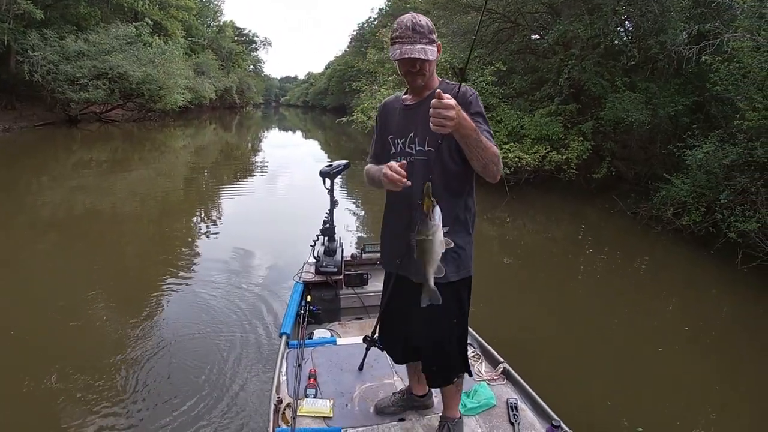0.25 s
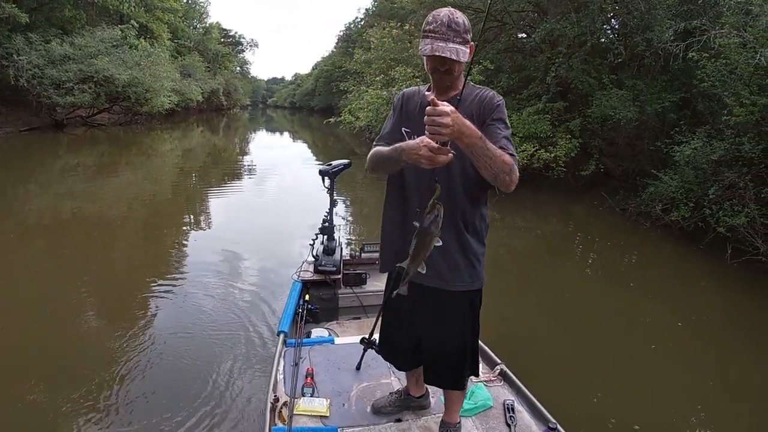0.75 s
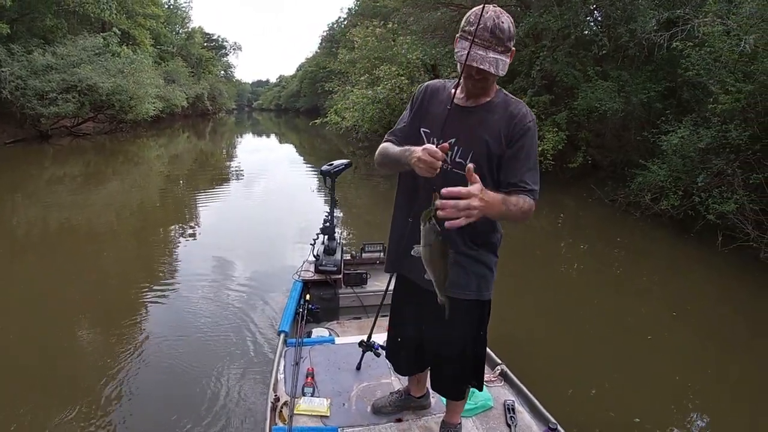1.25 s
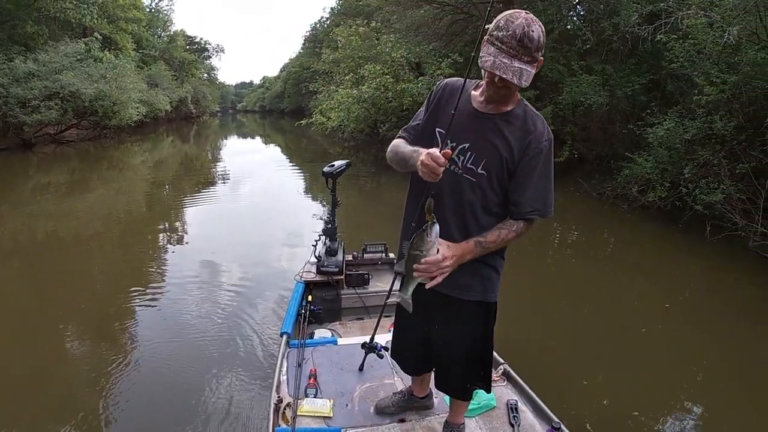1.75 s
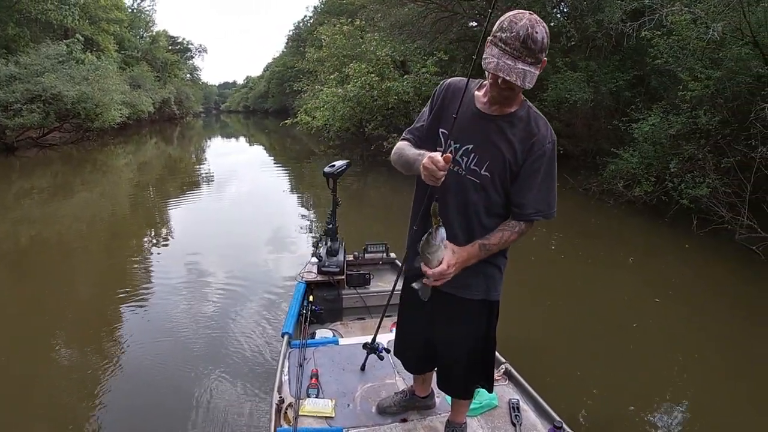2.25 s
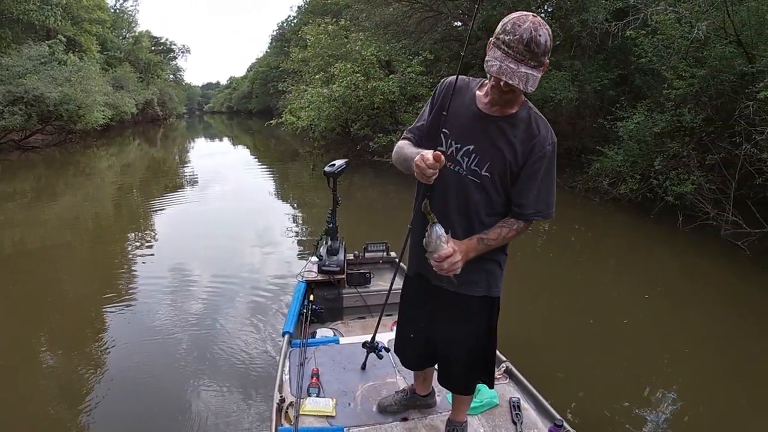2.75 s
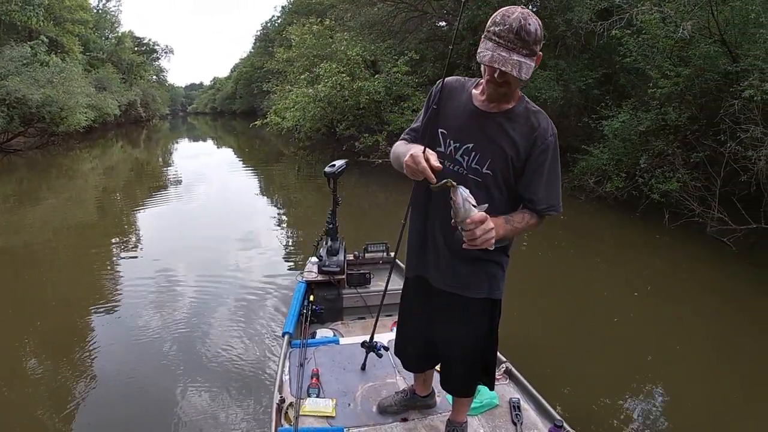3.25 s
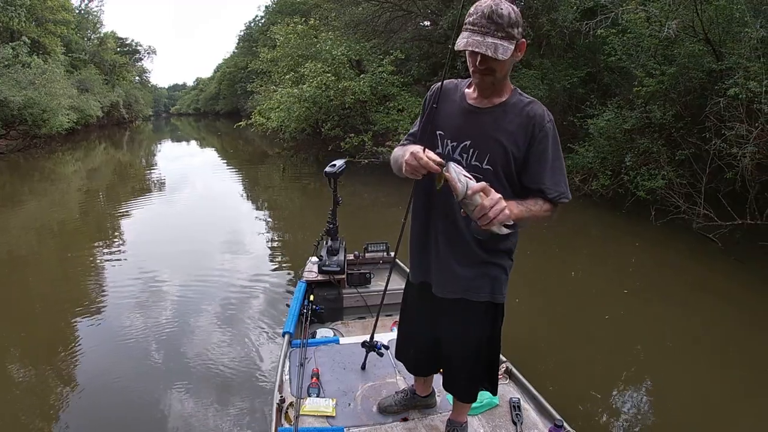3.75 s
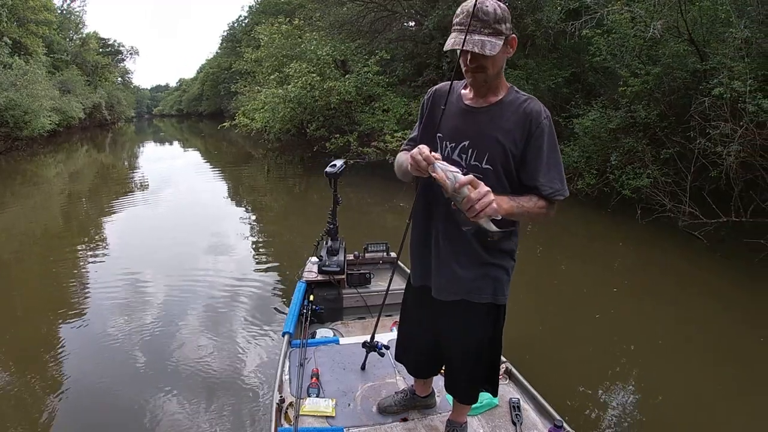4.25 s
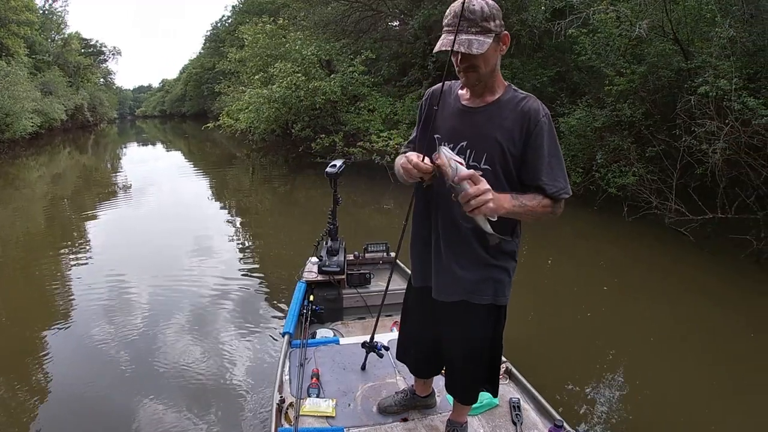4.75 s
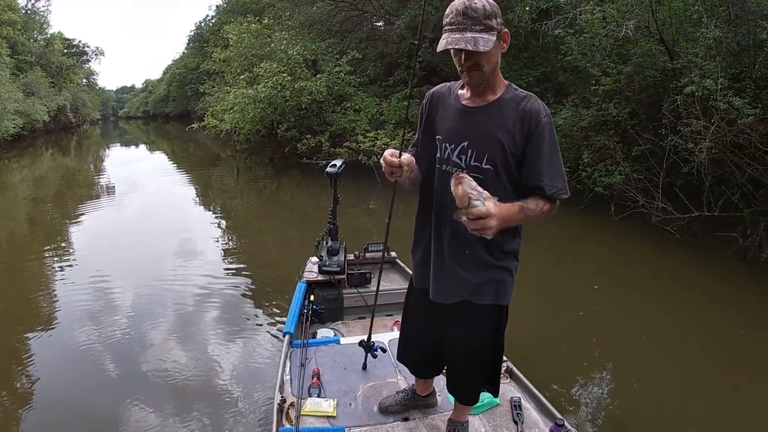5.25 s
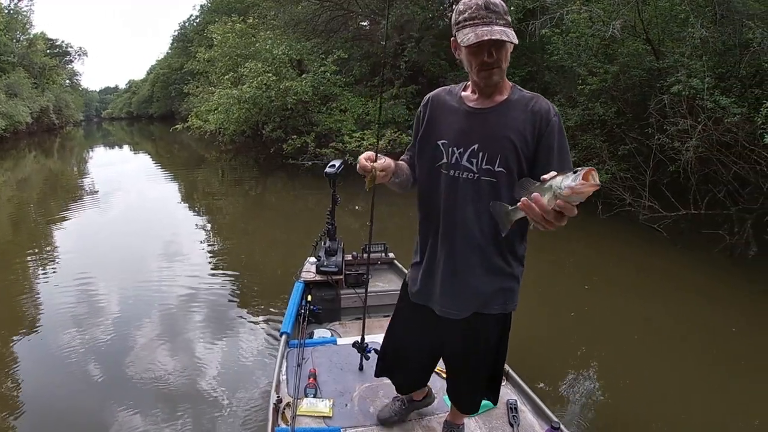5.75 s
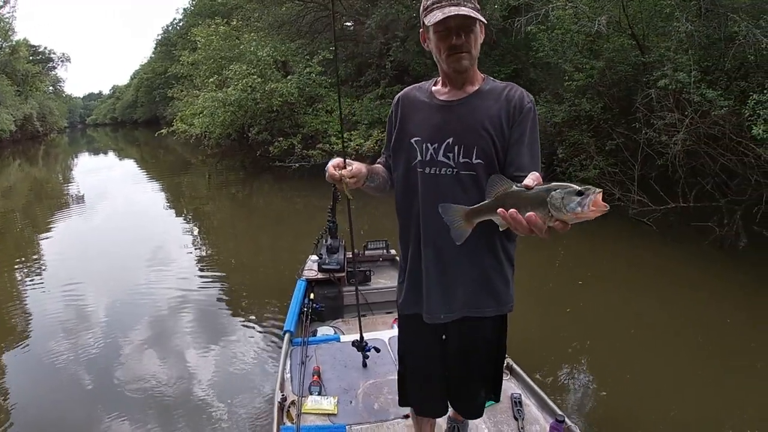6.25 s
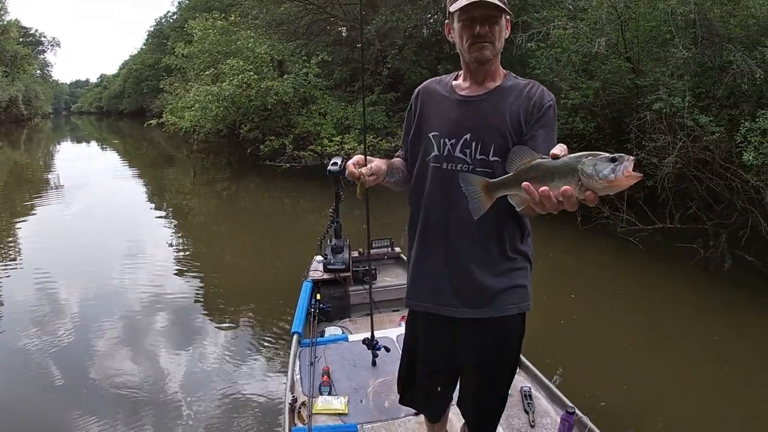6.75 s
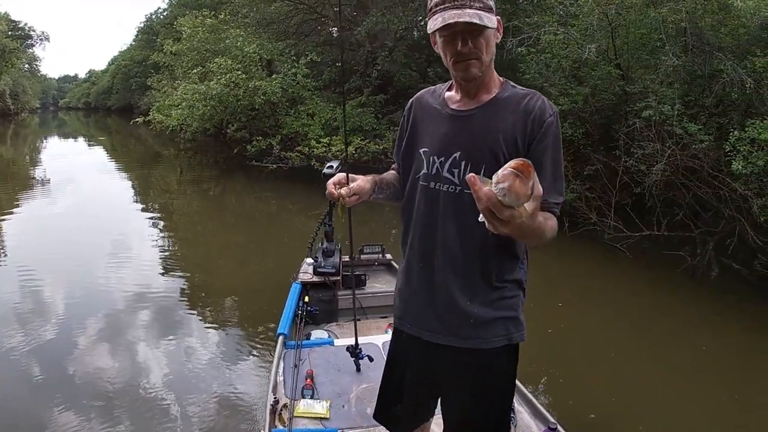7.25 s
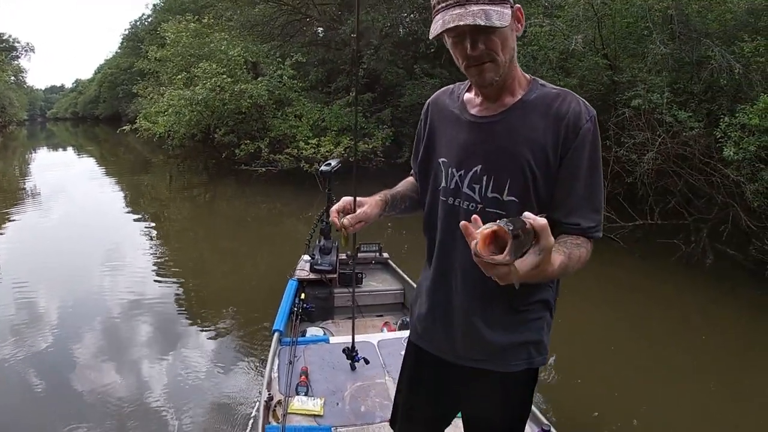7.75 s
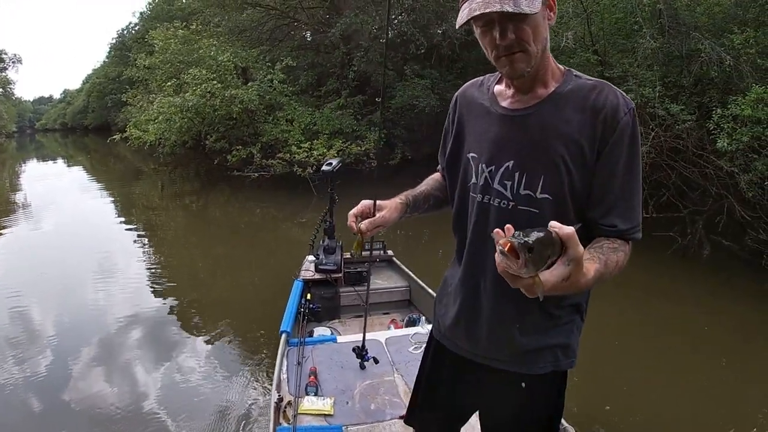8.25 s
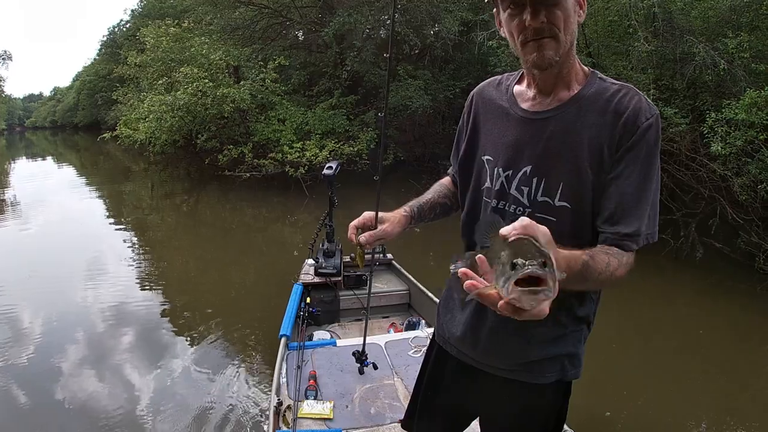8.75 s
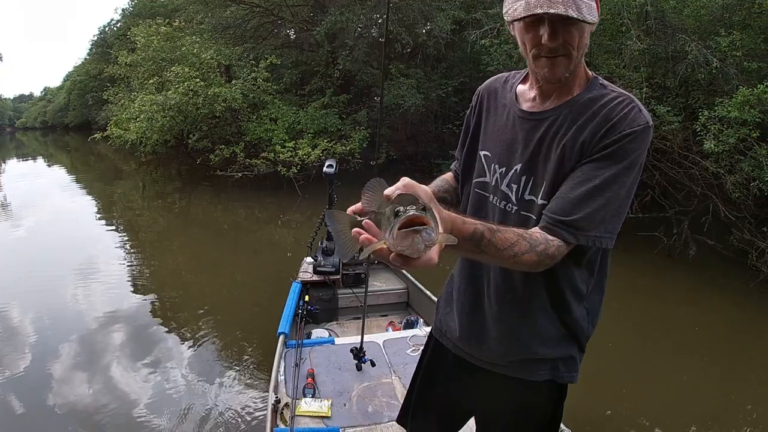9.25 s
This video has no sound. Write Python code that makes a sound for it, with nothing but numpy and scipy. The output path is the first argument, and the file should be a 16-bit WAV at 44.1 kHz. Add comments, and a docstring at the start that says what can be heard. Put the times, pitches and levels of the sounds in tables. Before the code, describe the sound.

A shrill cicada chorus, with a softer lower layer, runs throughout along a tree-lined river, swelling around 2.5 seconds and again after 7. Two finer, very high buzzes waver nearby until they slow and fade between about 6 and 8 seconds. Water murmurs low at a small metal boat. At 0.5 seconds a cluster of soft, deep thumps shakes the hull, with lesser bumps near 1.1. Faint far whistles come around 1.5, then a bright, quick bird phrase at 2.3 to 2.6, echoing from the trees. Wet clicks gather from 4 to 5.1, strongest at 4.5, with a short rub near 5. Taps and a low thump follow around 6.2, a firmer knock at 7.3, and a soft bump at 8.7. Distant birds whistle at 4.5, 7.8 and 8.6, with a faint hoot at 8.8. The single-channel microphone sits on the boat.

```python
"""Cicadas drone in the trees along a summer river, two nearer insects buzz, and water murmurs at a small metal boat.
A bird sings one quick phrase from the bank and others whistle far off: gliding tones with echoes from the trees.
An angler shifts his feet and unhooks a fish: soft thumps ring the hull; noise bursts make taps and wet clicks.
The insects are trains of clicks, filtered to give them their pitch; water and rubbing are filtered noise."""
import sys
import numpy as np
from scipy import signal
from scipy.fft import rfft, irfft
from scipy.io import wavfile

SR = 44100
rng = np.random.default_rng(int(sys.argv[2]) if len(sys.argv) > 2 else 0)


def generate_wav(sig):
    """Save sig (samples, or channels by samples) to the path in sys.argv[1] as 16-bit PCM at SR."""
    pcm = np.round(np.clip(np.atleast_2d(sig).T, -1, 1) * 32767).astype(np.int16)
    wavfile.write(sys.argv[1], SR, pcm)


N = 419832  # length in samples

# feet and knees against the boat: start_s, level_db (peak of the panel's part), pitch_hz,
# decay_s (time for the panel to fall by 60 dB)
THUMP_BLOWS = [(.476, -32, 74.2, 0.36), (.499, -26.5, 107, 0.07), (.506, -34.5, 222, 0.044),
               (.507, -48.5, 370, .06), (.533, -30.5, 72.3, 0.11), (.546, -36, 165, 0.067),
               (.591, -43, 180, .15), (1.031, -49.5, 280, 0.11), (1.122, -47.5, 172, 0.056),
               (1.279, -50.5, 261, 0.08), (5.923, -45.5, 186, 0.11), (6.159, -28.5, 77, 0.17),
               (6.248, -44, 225, 0.11), (6.283, -45, 180, .16), (6.645, -44, 149, 0.11),
               (6.658, -43, 493, 0.072), (6.675, -50, 298, 0.054), (7.172, -42.5, 206, 0.16),
               (7.264, -27, 168, 0.071), (7.27, -36, 90.4, 0.1), (7.287, -31.5, 203, 0.069),
               (7.517, -39.5, 174, .09), (7.52, -51, 410, .062), (8.702, -36.5, 167.4, 0.17),
               (8.703, -47, 240, 0.1), (8.71, -38, 107, 0.165)]


def from_db(db):
    """Turn decibels into a gain."""
    return 10 ** (np.asarray(db) / 20)


def rms_one(x):
    """Scale a sound to an average (rms) level of 1."""
    return x / np.sqrt(np.mean(x ** 2) + 1e-20)


def in_time(rows):
    """Draw each column of a table as a curve, sample by sample; the first column is time."""
    s, *columns = np.transpose(rows)
    return [np.interp(np.arange(N) / SR, s, column) for column in columns]


def colour(x, spectrum):
    """Filter a steady sound to a spectrum, then scale it to rms 1."""
    hz, db = np.transpose(spectrum)
    f = np.fft.rfftfreq(N, 1 / SR) + 1e-3  # the small offset avoids log(0)
    gain = from_db(np.interp(np.log(f), np.log(hz), db))
    return rms_one(irfft(rfft(x) * gain, N))


def drift(per_s):
    """Wander at random: straight lines join random points of spread 1, per_s of them a second."""
    knots = rng.standard_normal(4096)
    return np.interp(np.arange(N) / SR * per_s, np.arange(len(knots)), knots)


def resonate(x, hz, width):
    """Ring at one pitch, with gain 1 at the top; a narrow width (Hz) rings longer."""
    r = np.exp(-np.pi * width / SR)
    feed = np.array([1, 0, -1]) * (1 - r * r) / 2
    feedback = [1, -2 * r * np.cos(2 * np.pi * hz / SR), r * r]
    return signal.lfilter(feed, feedback, x + 1e-18)


def dying(t, t60):
    """Fade exponentially, falling by 60 dB in t60 seconds."""
    return np.exp(-np.log(1000) * t / t60)


def add(out, s, sound):
    """Mix a short sound in at time s (seconds)."""
    at = max(round(s * SR), 0)
    out[at:at + len(sound)] += sound[:N - at]


def click_train(per_s, uneven_db):
    """Make one click a cycle, each of its own strength, placed between samples."""
    cycles = rng.random() + np.cumsum(per_s) / SR
    at = np.flatnonzero(np.diff(np.floor(cycles)))
    late = (np.ceil(cycles[at]) - cycles[at]) * SR / per_s[at]  # fraction of a sample
    strengths = from_db(uneven_db * rng.standard_normal(8192))
    size = strengths[np.arange(len(at)) % 8192]
    out = np.zeros(N)
    out[at], out[at + 1] = size * (1 - late), size * late
    return out


def woods(x, t60, wet_db, build_s=0.0093):
    """Trunks and leaves scatter a sound into a smooth tail that builds up, then dies."""
    t = np.arange(2 * SR) / SR
    tail = rng.standard_normal(len(t)) * dying(t, t60) * (1 - np.exp(-t / build_s))
    scattered = signal.fftconvolve(x, tail / np.linalg.norm(tail))[:N]
    return x + from_db(wet_db) * scattered


def river():
    """Slow water murmurs at the hull and washes along it; each thump rocks the boat and stirs a dying rumble."""
    # low rumble under the thumps, before the trim below: time_s, level_db
    rumble_levels = [(0, -61), (.45, -60), (1.0, -53.5), (1.35, -66), (2.9, -65), (3.2, -59.5), (4.3, -67),
                     (4.5, -85), (5.5, -80), (6.85, -56.5), (7.05, -65), (7.33, -44.5), (8.0, -71),
                     (9.52, -58.5)]
    # water stirred along the sides, before its random flicker: time_s, level_db
    wash_levels = [(0, -74), (1.3, -74), (1.9, -77), (5.3, -74.5), (6.1, -66.5), (8, -68.5), (9.52, -67.5)]
    # water at the hull, before its random flicker: time_s, level_db
    water_levels = [(0, -61.5), (2.6, -62), (3.7, -61), (4.5, -61.5), (5.2, -62.5), (5.9, -60),
                    (9.52, -63.5)]
    # tone colour of water and air around the boat: pitch_hz, relative level_db (per Hz)
    water_colour = [(20, -1), (45, -2.5), (80, -8.5), (120, -3), (175, 3.5), (230, -5), (300, -15.5),
                    (450, -22), (600, -21.5), (760, -14.5), (1000, -22), (2000, -23.5), (4000, -19),
                    (14000, -57)]
    # tone colour of the wash: pitch_hz, relative level_db (per Hz)
    wash_colour = [(80, -25), (180, 3), (300, -2.5), (450, -3), (700, -20), (1300, -17), (3000, -31.5)]
    # tone colour of the rumble: pitch_hz, relative level_db (per Hz)
    rumble_colour = [(15, -17), (35, 7), (65, 8), (110, -1.5), (250, -7), (600, -71)]
    rock_db, rock_t60_s = -15.5, 0.72  # rumble compared with the blow, before the trim; its fade
    rock_hz = 130  # a blow well above this pitch is too quick to rock the boat much

    (rumble_db,), (wash_db,), (water_db,) = in_time(rumble_levels), in_time(wash_levels), in_time(water_levels)
    t = np.arange(2 * SR) / SR
    rocking_power = from_db(rumble_db) ** 2
    for s, db, hz, _ in THUMP_BLOWS:
        sway = from_db(db + rock_db) / (1 + (hz / rock_hz) ** 2) * dying(t, rock_t60_s)
        add(rocking_power, s, sway ** 2)
    water = from_db(water_db + 1.9 * drift(11)) * colour(rng.standard_normal(N), water_colour)
    wash = from_db(wash_db + 3.7 * drift(22)) * colour(rng.standard_normal(N), wash_colour)
    flicker = from_db(3.6 * drift(10.0) - 1.0)  # includes a trim of -1 dB
    rumble = np.sqrt(rocking_power) * flicker * colour(rng.standard_normal(N), rumble_colour)
    return water + wash + rumble


def cicadas(song, throb_db, far_db, count):
    """A few tymbals (drum skins) click and throb at their own paces, over the noise blur of countless far ones."""
    near = 0
    # each insect's clicks per second and throbs per second
    for pace, throb_hz in rng.uniform([180, 5], [480, 24], (count, 2)):
        throb_cycles = np.cumsum(throb_hz * (1 + 0.1463 * drift(3))) / SR
        throb = np.sin(2 * np.pi * throb_cycles)
        train = click_train(pace * (1 + .04 * drift(150)), uneven_db=1.5)
        near = near + train * from_db(throb_db * throb)
    far = colour(rng.standard_normal(N), song)
    return rms_one(colour(near, song) + from_db(far_db) * far)


def chorus():
    """Two kinds of cicada swell and ebb along the banks; one thin trill, noise in a narrow ring, holds its pitch."""
    # the two kinds, before their trims below: time_s, shrill_level_db, low_level_db
    chorus_levels = [(0.08, -49, -60), (1.4, -48, -61), (1.75, -46, -57.5), (2.26, -45, -58),
                     (2.6, -44, -56), (3.59, -48.5, -59.5), (4.07, -48, -61), (4.24, -48.5, -61.5),
                     (4.28, -48.5, -59), (5.56, -50, -61), (6.01, -49, -60), (6.59, -49, -60.5),
                     (6.99, -46.5, -60.5), (7.66, -46, -57), (9.33, -46, -58.5), (9.45, -46, -59.5)]
    # tone colour of the shrill kind: pitch_hz, relative level_db (per Hz)
    shrill_song = [(2500, -44), (4200, -12), (4750, -5.5), (5150, 0), (5700, 2), (6100, -1.5), (6600, -8),
                   (7200, -15.5), (7800, -19), (8400, -23.5), (9100, -21.5), (10300, -32.5), (11500, -40.5),
                   (15000, -49)]
    # tone colour of the lower kind: pitch_hz, relative level_db (per Hz)
    low_song = [(1900, -35), (2500, -18.5), (3000, -11.5), (3400, -2), (3800, 4.5), (4200, 5), (4700, -6),
                (5600, -26), (8000, -57)]
    trill_hz, trill_db = 5260, -61

    shrill_db, low_db = in_time(chorus_levels)
    shrill = from_db(shrill_db + 4.78) * cicadas(shrill_song, throb_db=3.0, far_db=-0.5, count=9)
    low = from_db(low_db + 5.67) * cicadas(low_song, throb_db=0.5, far_db=4.5, count=4)
    trill = resonate(resonate(rng.standard_normal(N), trill_hz, 40), trill_hz, 40)
    return shrill + low + from_db(trill_db) * rms_one(trill)


def near_insects():
    """Steady click trains ring a small body as wavering high lines; each slows and fades as it winds down."""
    # the two insects: pace (clicks per second), level_db (before trim and fading), wind_down_start_s
    insects = [(329.7, -64.3, 6.4), (335, -66, 6.1)]
    # resonances of an insect's body: pitch_hz, width_hz, relative level_db
    body = [(9410, 530, -1), (9830, 440, -0.5), (14000, 870, -19)]
    wind_down_s, wind_down_db = 1.4, -13.5  # how long it takes, and the change in level
    slowing = .025  # share of the pace lost
    trim_db = 0.56

    out = 0
    for pace, buzz_db, tires_s in insects:
        spent = np.clip((np.arange(N) / SR - tires_s) / wind_down_s, 0, 1)
        unsteady = .0045 * drift(200) + .0015 * drift(12) + .0022 * drift(1.2)
        train = click_train(pace * (1 - slowing * spent + unsteady), uneven_db=2.0)
        buzz = 0
        for hz, width, db in body:
            ring = resonate(resonate(train, hz, width), hz, width)
            # leaves scatter the ring of each resonance
            buzz = buzz + from_db(db) * woods(ring, t60=0.14, wet_db=0.0)
        flutter_db = 1.0 * drift(25) + 0.6 * drift(1.88)
        out = out + from_db(trim_db + buzz_db + wind_down_db * spent + flutter_db) * rms_one(buzz)
    return out


def whistle(notes, attack, release, second_db, third_db, waver=0):
    """Nearly pure notes arc through three pitches; attack and release are shares of a note, waver shakes the pitch."""
    out, shake = np.zeros(N), 1 + waver * drift(180)
    for s, length, start, middle, end, db in notes:
        u = np.linspace(0, 1, round(length * SR))  # progress through the note
        arc = np.polyfit([0, .5, 1], [start, middle, end], 2)
        pitch = np.polyval(arc, u) * shake[round(s * SR):][:len(u)]
        phase = 2 * np.pi * np.cumsum(pitch) / SR
        overtones = from_db(second_db) * np.sin(2 * phase) + from_db(third_db) * np.sin(3 * phase)
        tone = np.sin(phase) + overtones
        edge = np.minimum(1, np.minimum(u / attack, (1 - u) / release))
        swell = np.sin(np.pi / 2 * edge) ** 2
        add(out, s, np.sqrt(2) * from_db(db) * tone * swell)
    return out


def birds():
    """A small near bird, weak at low pitch, is mostly direct with a long mellow echo; trees blur the far birds."""
    # The three tables share columns: start_s, length_s, start_hz, middle_hz, end_hz,
    # level_db (of the whistle, before any flicker, filter, echo or trim).
    # the near bird's glides
    near_notes = [(2.276, .089, 2050, 4810, 2700, -34), (2.356, .028, 2950, 3650, 5700, -35.5),
                  (2.379, .014, 5350, 4650, 4200, -38), (2.461, .044, 5020, 5270, 5300, -28.4),
                  (2.489, .016, 5420, 5730, 5880, -34), (2.545, .01, 5000, 4100, 2800, -33.5),
                  (2.551, .021, 3000, 2250, 1500, -44)]
    # the far birds' glides
    far_notes = [(1.46, 0.048, 2500, 2380, 2380, -71), (1.53, .05, 2680, 2700, 2870, -69),
                 (1.572, 0.034, 2740, 3050, 3630, -56.5), (1.705, 0.044, 3220, 3220, 3180, -59),
                 (4.445, 0.075, 2850, 2404, 2600, -64.5), (4.553, 0.0415, 3260, 2810, 2750, -59),
                 (4.588, .1, 2640, 2465, 2180, -69), (7.78, .05, 3295, 2950, 2900, -56.5),
                 (7.83, .05, 2990, 2650, 2380, -65), (7.945, 0.05, 2710, 2580, 2690, -61),
                 (8.49, 0.08, 2760, 2830, 2920, -71), (8.67, .085, 2650, 2930, 2440, -63)]
    # a distant hoot
    hoot_notes = [(8.795, 0.262, 748, 706, 740, -62.5)]
    throat_hz = 2350  # the small bird gives out little sound below this pitch

    song = whistle(near_notes, attack=.36, release=.2, second_db=-36, third_db=-31, waver=.006)
    song = song * from_db(1.0 * drift(250))
    song = signal.sosfilt(signal.butter(4, throat_hz, "high", fs=SR, output="sos"), song)
    near = woods(song, t60=.35, wet_db=-9.5)
    # the middle pitches roll on along the banks; only the echo is kept
    mellow = resonate(resonate(song, 2240, 450), 2670, 450)
    long_echo = woods(mellow, t60=6.3, wet_db=3.5, build_s=0.064) - mellow

    calls = whistle(far_notes, attack=0.13, release=0.24, second_db=-34, third_db=-40, waver=0.022)
    far = woods(calls * from_db(3.7 * drift(70)), t60=.65, wet_db=3.5)
    hoot = whistle(hoot_notes, attack=0.4, release=0.19, second_db=-26, third_db=-35)
    return near + long_echo + from_db(-1) * far + woods(hoot, t60=0.22, wet_db=-4.5)


def rubbing():
    """Cloth, hands and wet skin rub: each stroke is uneven friction noise that swells and fades."""
    # strokes: start_s, level_db (rms), pitch_hz, length_s
    strokes = [(0.503, -68, 800, .07), (0.593, -68, 1400, 0.041), (1.268, -68, 570, 0.058),
               (4.833, -68.5, 1590, 0.32), (4.952, -62.5, 1000, .014), (4.956, -54, 2600, 0.017),
               (5.655, -77, 920, 0.39), (6.656, -63.5, 455, 0.098), (7.265, -54.5, 705, 0.014),
               (7.88, -68, 1520, 0.1), (8.29, -72, 645, .089)]
    out, grain = np.zeros(N), from_db(1.0 * drift(180)) * rng.standard_normal(N)
    for s, db, hz, length in strokes:
        stroke = grain[round(s * SR):round((s + length) * SR)]
        width = 0.79 * hz
        stroke = resonate(resonate(stroke, hz, width), hz, width)
        stroke = stroke * signal.windows.tukey(len(stroke), .6)
        add(out, s, from_db(db) * rms_one(stroke))
    return out


def clicks(rows, width_hz, t60, tail_db, tail_t60):
    """Each contact is a brief rough burst in one broad resonance, with a short rattle after it."""
    out, t = np.zeros(N), np.arange(SR // 5) / SR
    for s, db, hz in rows:
        fade = dying(t, t60) + from_db(tail_db) * dying(t, tail_t60)
        burst = rng.standard_normal(len(t)) * fade
        click = resonate(resonate(burst, hz, width_hz), hz, width_hz)
        add(out, s, from_db(db) * click / np.abs(click).max())
    return out


def handling():
    """Tackle taps on the deck, wet clicks of the fish and sharp ticks of the line are short noise bursts."""
    # Each level_db is a peak before the trims below.
    # light taps of tackle on the deck: start_s, level_db, pitch_hz
    tap_hits = [(0.501, -42.5, 397), (0.532, -48, 425), (1.068, -47.5, 720), (1.275, -51, 423),
                (1.696, -53, 423), (2.038, -51, 800), (5.759, -48.5, 837), (5.913, -50.5, 934),
                (6.028, -46.5, 450), (6.156, -44, 541), (6.192, -45.5, 487), (6.405, -48.5, 482),
                (6.476, -50, 635), (6.811, -55, 870), (6.937, -53, 430), (7.138, -51, 732),
                (7.177, -52, 423), (7.588, -47.5, 503), (8.302, -50.5, 506), (8.962, -51.5, 700)]
    # wet clicks as the hook works in the fish's mouth: start_s, level_db
    wet_hits = [(.336, -50), (3.989, -53), (4.338, -48), (4.372, -47.5), (4.4883, -49), (4.5112, -39),
                (4.795, -52), (4.877, -50), (4.9105, -48), (4.9563, -45), (4.9697, -49), (5.0577, -49),
                (5.074, -52)]
    # sharp ticks of the line and hook: start_s, level_db
    tick_hits = [(0.617, -49), (5.0025, -49)]
    snap_hz, deck_hz = 1650, 210  # the hard edge of a tap, and the deck's answer
    mouth_hz, tick_hz = 1800, 9500
    # average rate, middle level and middle pitch
    faint_taps_per_s, faint_tap_db, faint_tap_hz = 2.5, -59.5, 700

    taps = from_db(-1.5) * clicks(tap_hits, width_hz=720, t60=0.029, tail_db=-11.5, tail_t60=0.22)
    edges = [(s, db, snap_hz) for s, db, _ in tap_hits]
    snaps = from_db(-4.5) * clicks(edges, width_hz=3400, t60=0.045, tail_db=-1, tail_t60=0.11)
    answers = [(s, db, deck_hz) for s, db, _ in tap_hits]
    deck = from_db(-3.0) * clicks(answers, width_hz=122, t60=0.049, tail_db=-7, tail_t60=0.21)

    # fainter taps fall at random, within 3 dB and half an octave either way
    faint_hits = [(s * N / SR, faint_tap_db + 6 * (size - .5), faint_tap_hz * 2 ** (pitch - .5))
                  for s, size, pitch in rng.random((64, 3))]
    faint_hits = faint_hits[:round(faint_taps_per_s * N / SR)]
    faint_taps = clicks(faint_hits, width_hz=1260, t60=0.029, tail_db=-23, tail_t60=.1)

    # a wet click is a short crack and the ring of the open mouth
    wet = [(s, db, mouth_hz) for s, db in wet_hits]
    cracks = from_db(-4.5) * clicks(wet, width_hz=1300, t60=.012, tail_db=-21, tail_t60=.09)
    mouth = from_db(-4) * clicks(wet, width_hz=300, t60=0.012, tail_db=-12, tail_t60=0.13)

    sharp = [(s, db, tick_hz) for s, db in tick_hits]
    ticks = from_db(8.5) * clicks(sharp, width_hz=2700, t60=0.019, tail_db=-36, tail_t60=.06)
    return taps + snaps + deck + faint_taps + cracks + mouth + ticks


def thumps():
    """A soft blow flexes one deck panel, which passes the shock on to the hull's own ringing pitches."""
    # ringing pitches of the hull: pitch_hz, relative level_db, decay_s (to fall by 60 dB)
    hull_modes = [(44, -6, .3), (62, -3, .25), (78, 1, .25), (116, -6, .13), (148, -2, .14), (179, 0, .16),
                  (228, -4, .1), (325, -11, .08), (490, -13, .08), (740, -16, .07)]
    # partial tones of a deck panel: multiple of the blow's pitch, relative level_db
    panel_parts = [(.55, -23.5), (1, 3.5), (1.5, -12), (2.3, -16.5)]
    push_cycles = 0.27  # how gently the blow builds, in cycles of its pitch
    hull_db, shudder_db = -19, -24  # gains beside the panel, whose peak is 1

    out, t = np.zeros(N), np.arange(SR // 2) / SR
    for s, db, hz, t60 in THUMP_BLOWS:
        push = (1 - np.exp(-t * hz / push_cycles)) ** 2
        tones = sum(from_db(part_db) * np.sin(2 * np.pi * k * hz * t) for k, part_db in panel_parts)
        panel = push * dying(t, t60) * tones
        panel = panel / np.abs(panel).max()

        hull = 0
        strengths = rng.normal(1, 0.65, len(hull_modes))
        for strength, (f, mode_db, ring) in zip(strengths, hull_modes):
            # a slow blow hardly reaches the modes far above its own pitch
            reach = from_db(mode_db) / np.hypot(1, (f / hz / 2) ** 2)
            hull = hull + strength * reach * np.sin(2 * np.pi * f * t) * dying(t, ring)

        rough = resonate(resonate(rng.standard_normal(len(t)), 240, 300), 210, 300)
        shudder = rms_one(rough) * dying(t, 0.32)
        shock = push * (from_db(hull_db) * hull + from_db(shudder_db) * shudder)
        add(out, s, from_db(db) * (panel + shock))
    return out


def scene():
    """Add all the layers into one channel."""
    insects_and_birds = chorus() + near_insects() + birds()
    boat = thumps() + handling() + rubbing() + river()
    return (insects_and_birds + boat)[None]


def record(dry):
    """Cut the treble steeply above 14800 Hz."""
    return signal.sosfilt(signal.ellip(10, .1, 80, 14800, fs=SR, output="sos"), dry)


dry = scene()
out = record(dry)
generate_wav(out)
```